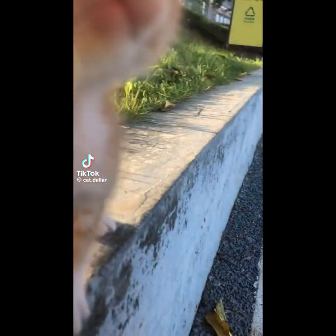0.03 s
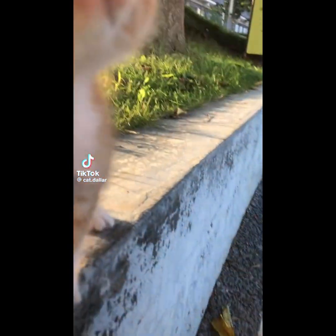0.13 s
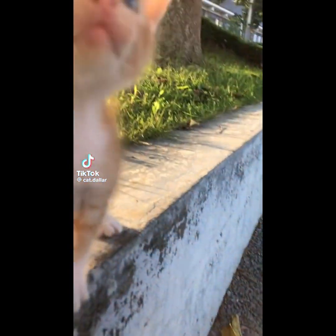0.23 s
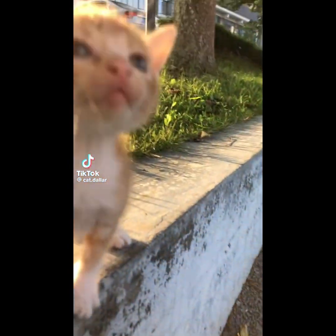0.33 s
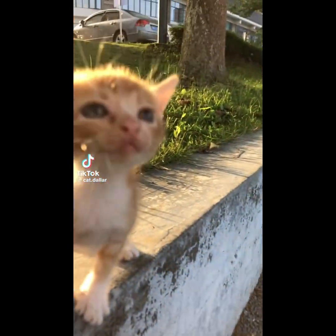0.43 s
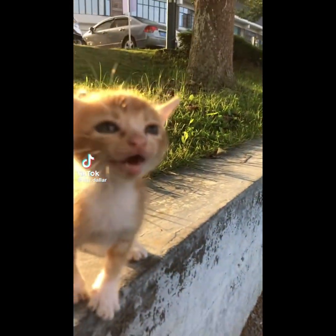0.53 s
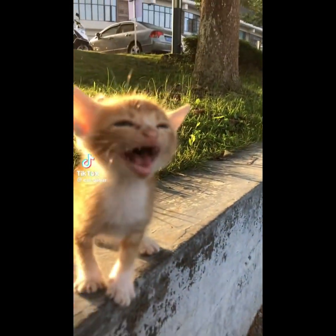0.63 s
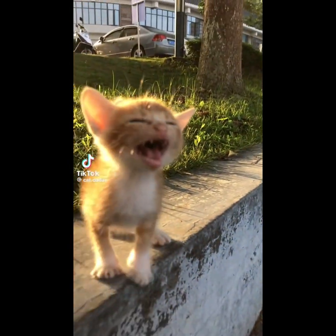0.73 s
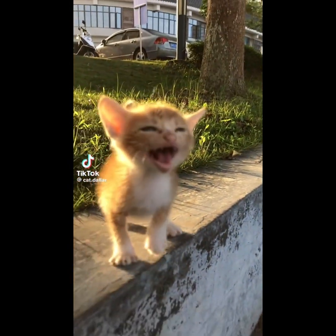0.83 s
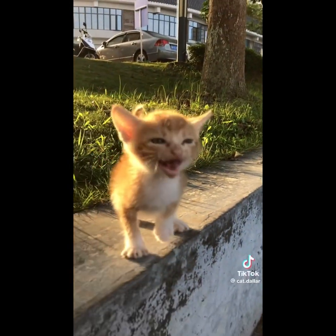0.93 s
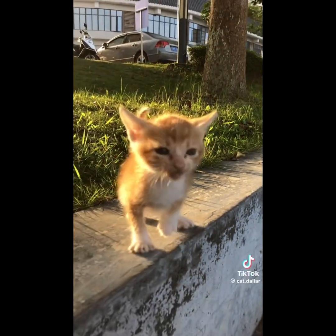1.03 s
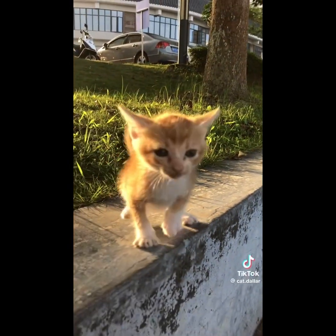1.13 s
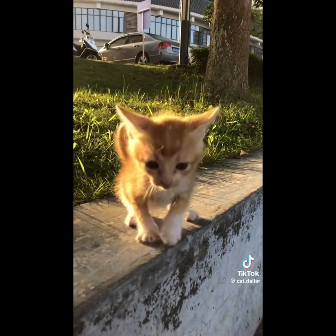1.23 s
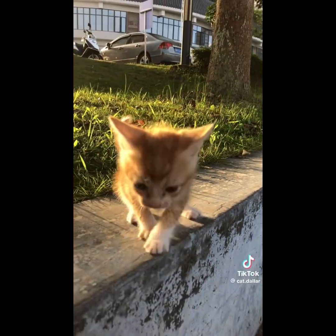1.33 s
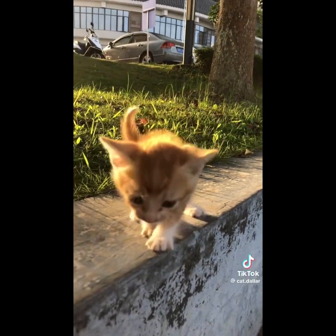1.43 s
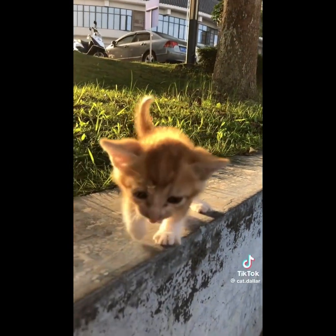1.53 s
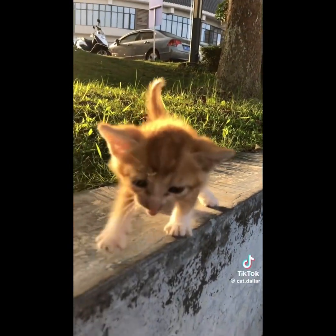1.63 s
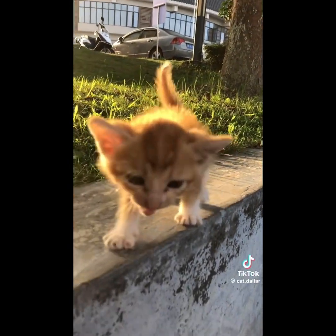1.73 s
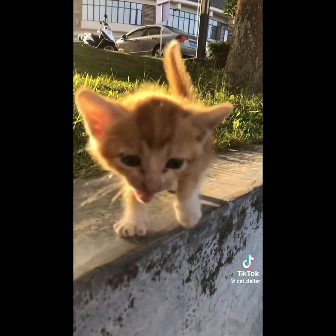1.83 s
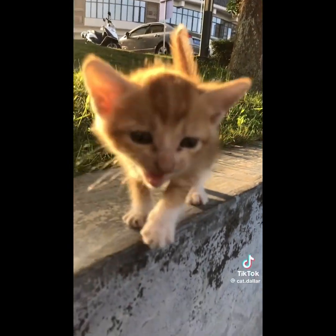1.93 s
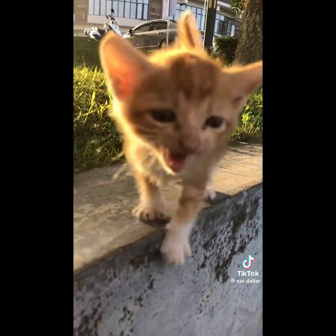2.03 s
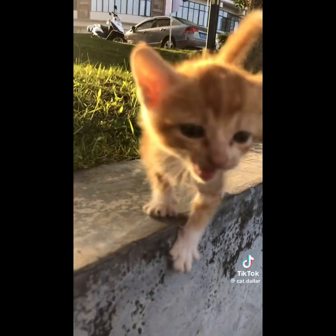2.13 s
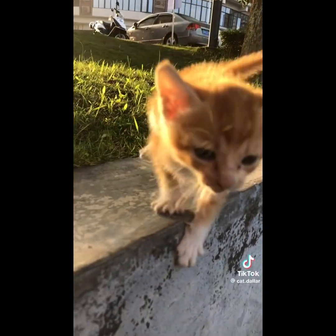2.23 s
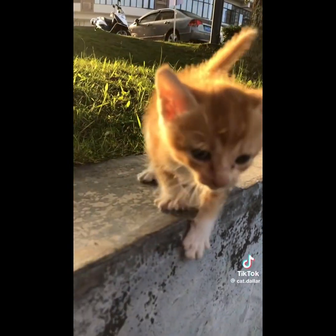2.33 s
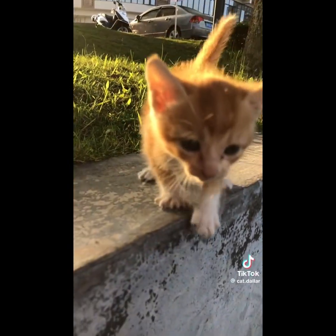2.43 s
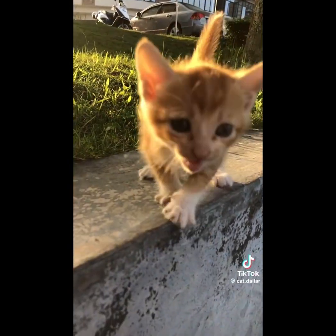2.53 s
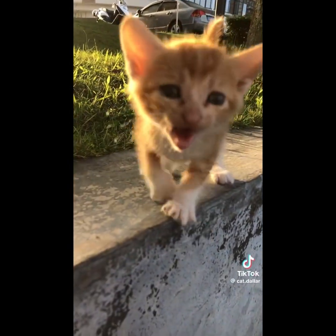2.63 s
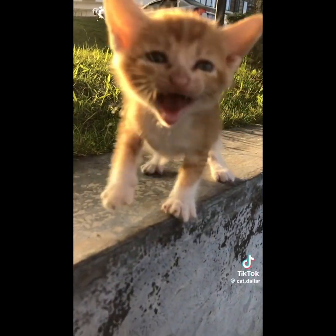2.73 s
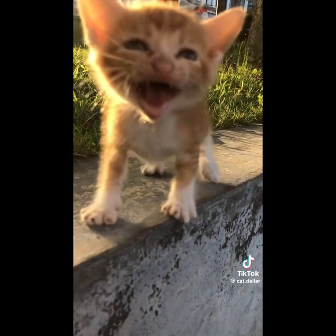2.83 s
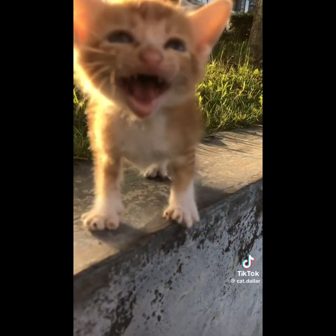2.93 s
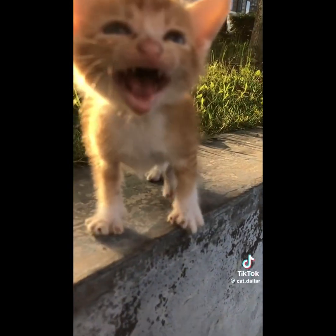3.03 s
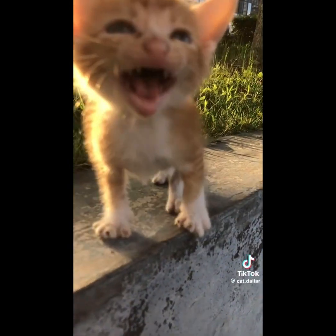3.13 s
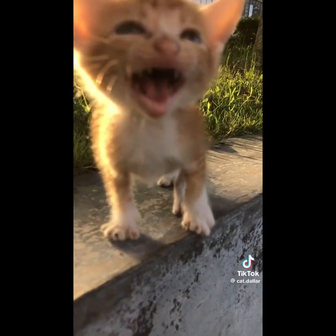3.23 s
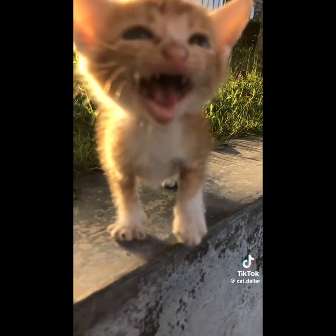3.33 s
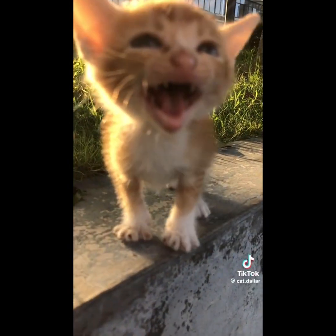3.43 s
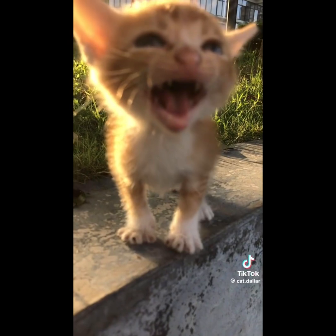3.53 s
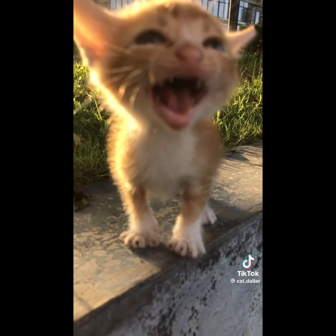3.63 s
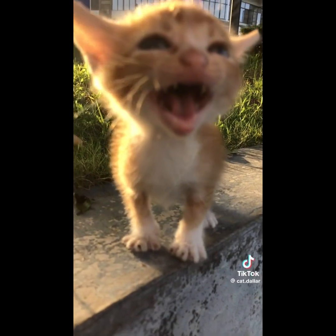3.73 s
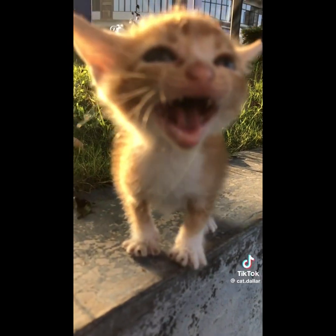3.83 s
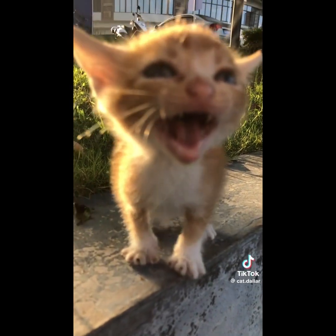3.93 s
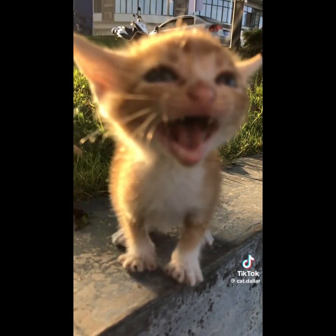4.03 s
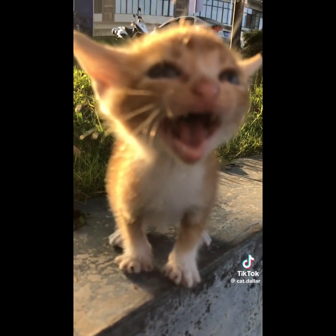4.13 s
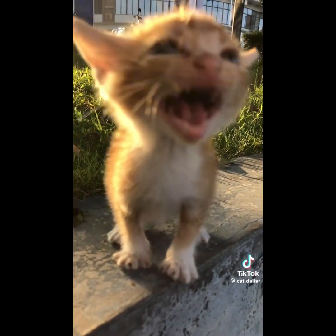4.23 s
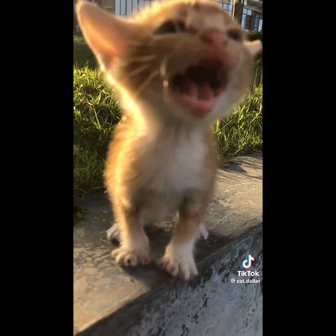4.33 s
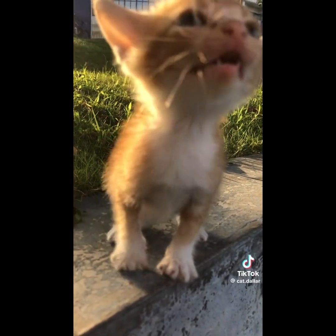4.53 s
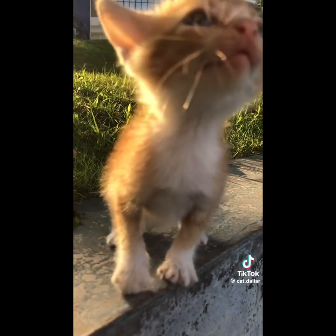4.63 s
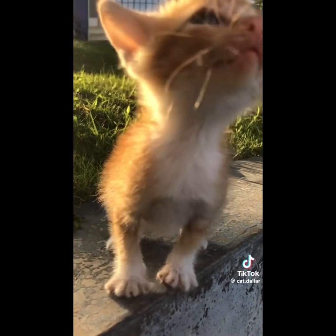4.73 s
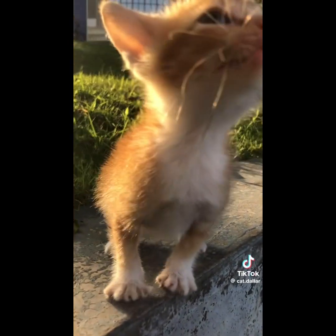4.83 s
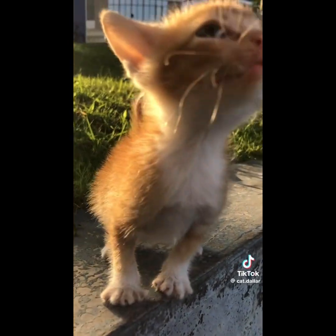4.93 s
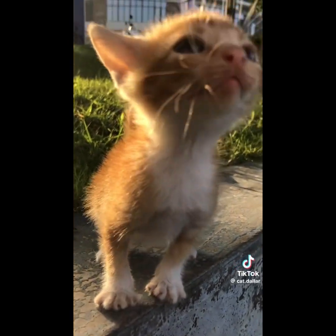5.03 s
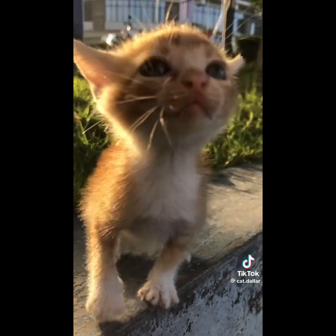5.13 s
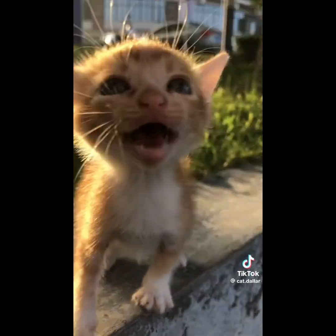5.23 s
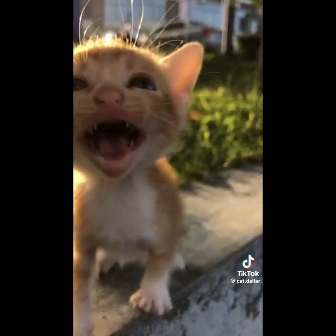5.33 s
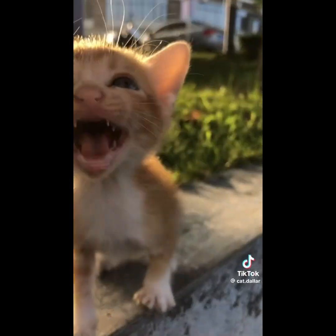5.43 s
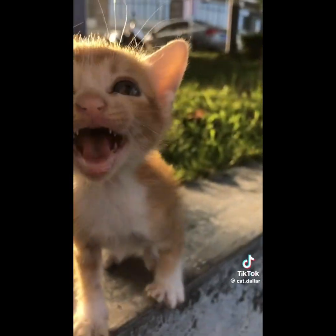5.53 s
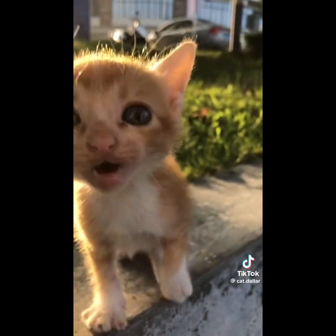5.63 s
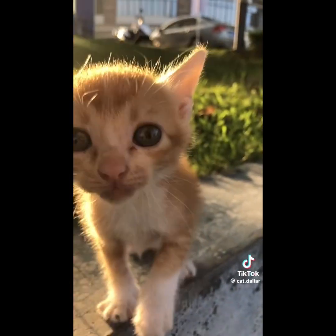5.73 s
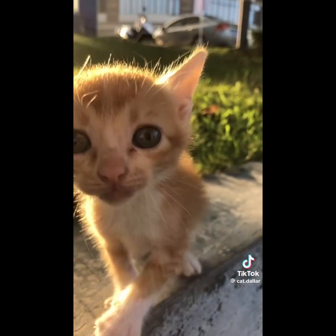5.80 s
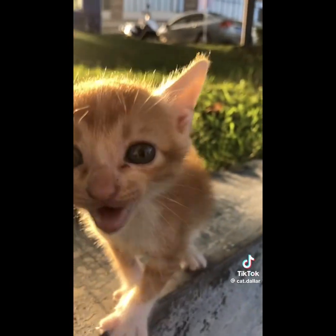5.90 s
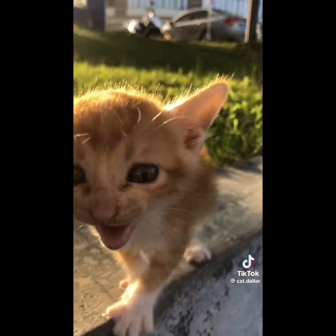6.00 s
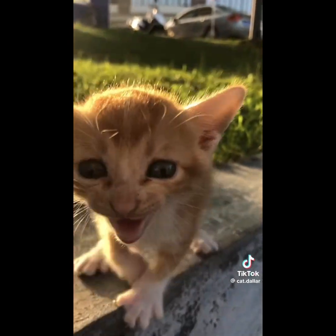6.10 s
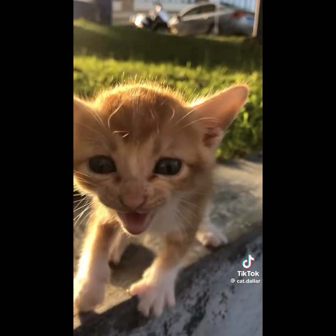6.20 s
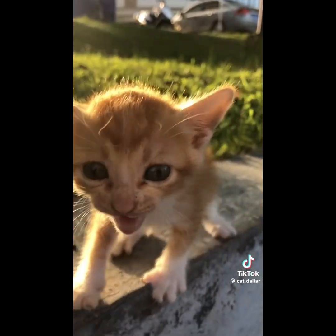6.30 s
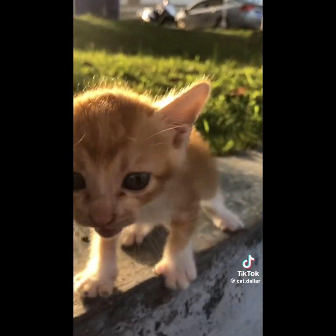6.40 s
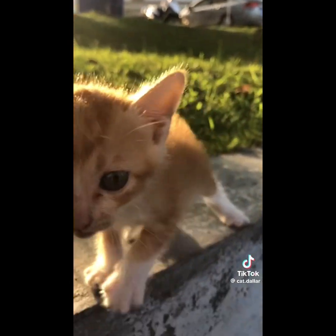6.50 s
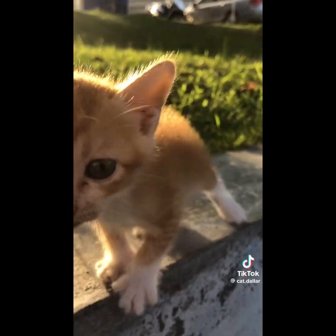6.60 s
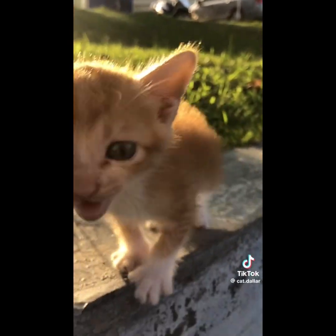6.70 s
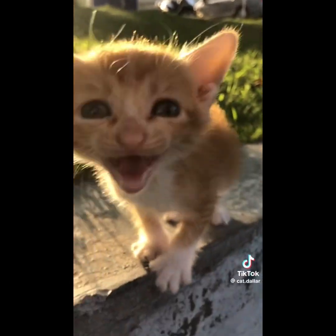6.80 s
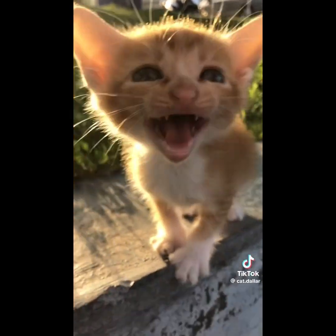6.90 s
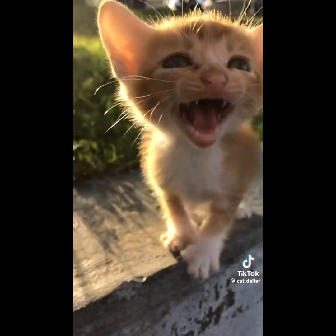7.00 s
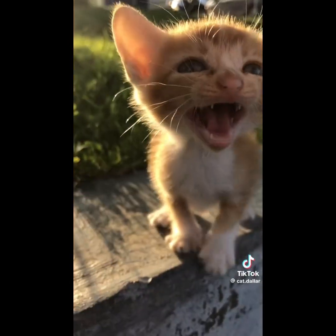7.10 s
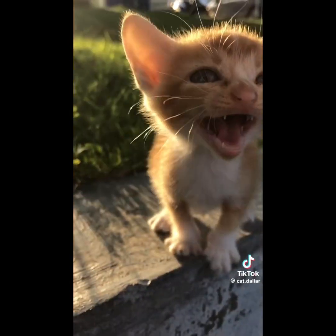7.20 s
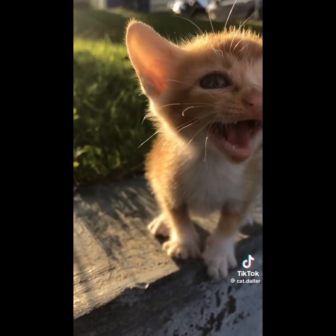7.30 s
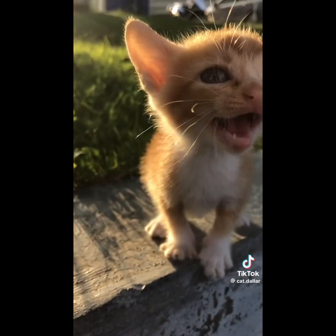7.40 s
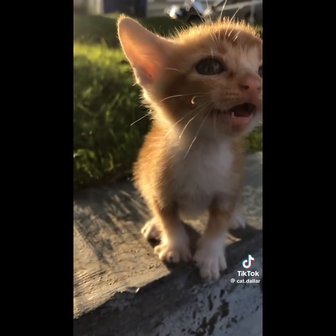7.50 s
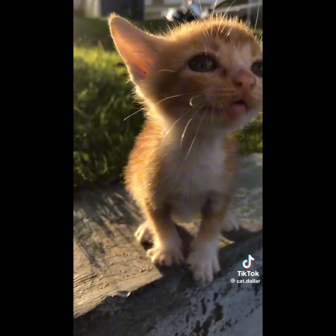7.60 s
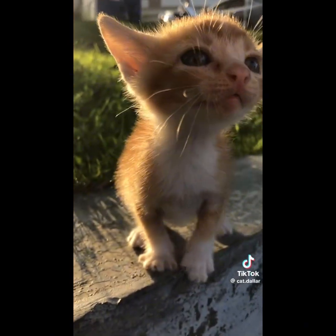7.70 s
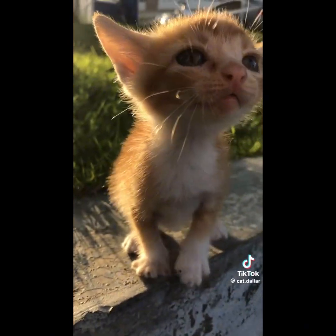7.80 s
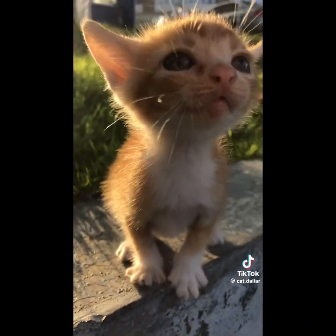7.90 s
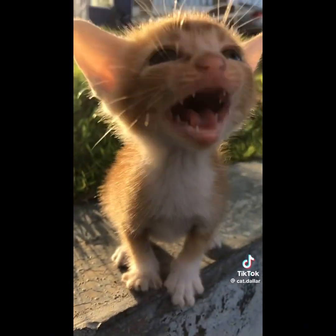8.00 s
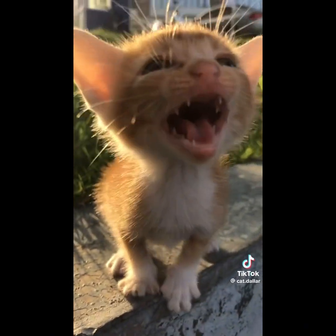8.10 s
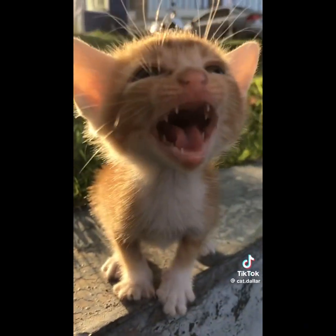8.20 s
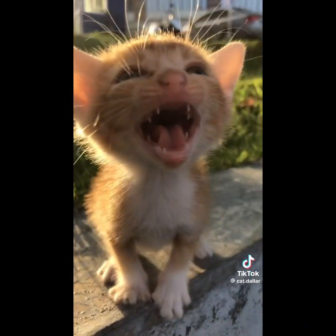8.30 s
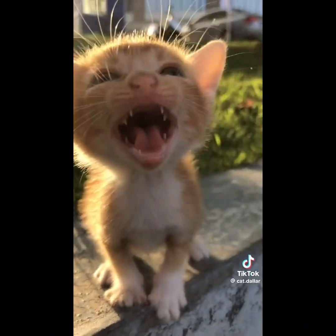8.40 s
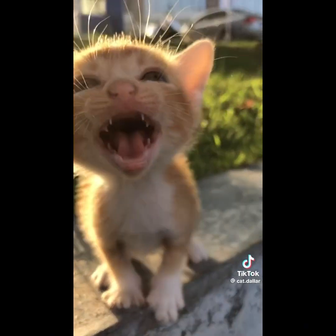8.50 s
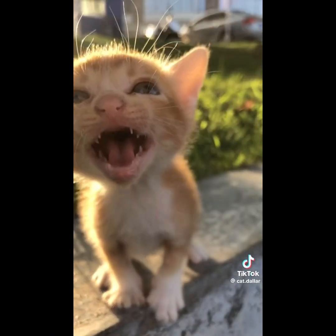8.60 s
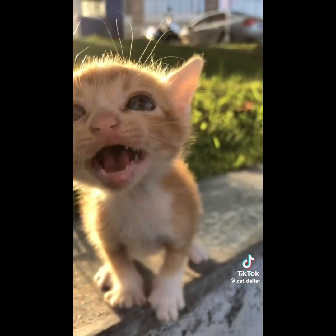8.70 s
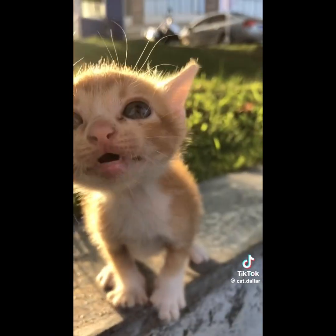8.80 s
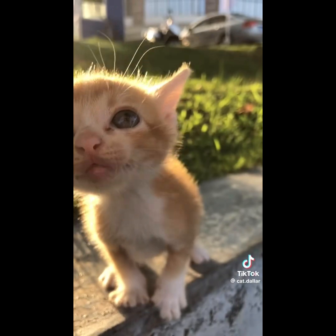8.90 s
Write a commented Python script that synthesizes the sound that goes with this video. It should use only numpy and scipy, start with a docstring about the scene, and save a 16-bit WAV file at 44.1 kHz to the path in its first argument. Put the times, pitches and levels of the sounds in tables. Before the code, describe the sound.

A tiny kitten meows seven times, high, piercing and raspy, close to the microphone outdoors, over faint distant traffic rumble.

```python
"""Concrete ledge beside a lawn: a young kitten meows seven times, close to a phone.
Each meow is a sum of vocal-fold harmonics, arching in pitch while the mouth opens and shuts,
which sweeps a strong resonance over them; shaped noise is the air rushing through the mouth.
Noise bursts are faint paw scuffs; behind lie far traffic rumble and hiss (shaped noise),
a thin distant whistle (gliding sine) and a very faint dull echo tail of the kitten."""
import sys
import numpy as np
from scipy import signal
from scipy.fft import rfft, irfft
from scipy.io import wavfile
from scipy.ndimage import uniform_filter1d

SR = 44100
rng = np.random.default_rng(int(sys.argv[2]) if len(sys.argv) > 2 else 0)


def bounce(signal):
    """Save signal as a 16-bit WAV file at the path given by the first command-line argument."""
    frames = np.transpose(np.atleast_2d(signal))
    limited = np.clip(frames, -1, 1)
    pcm = np.round(limited * 32767).astype(np.int16)
    wavfile.write(sys.argv[1], SR, pcm)


N = 394694
EDGE_HZ = 15600  # upper band limit


def gain_of(db):
    """Decibels to amplitude; an imaginary part becomes phase."""
    return 10 ** (np.asarray(db) / 20)


def evened(x):
    """Scales to rms 1."""
    return x / np.sqrt(np.mean(x ** 2) + 1e-20)


def read(points, hz):
    """Reads a spectrum on a log-frequency axis."""
    f, value = np.transpose(points)
    return np.interp(np.log(hz + 1), np.log(f + 1), value)


def follow(rows, t):
    """Reads every column of a curve at times t."""
    s, *columns = np.transpose(rows)
    return [np.interp(t, s, c) for c in columns]


def add(mix, s, sound):
    """Mixes a sound in at time s."""
    part = mix[:, round(s * SR):][:, :sound.shape[-1]]
    part += sound[..., :part.shape[1]]


def wander(hz, size):
    """Smooth random curve, up to about hz changes a second; rms 1 before trimming to size."""
    f = np.fft.rfftfreq(2 ** 17, 1 / SR)
    smooth = rfft(rng.standard_normal(2 ** 17)) / (1 + (f / hz) ** 2)
    return evened(irfft(smooth))[:size]


def bump(hz, centre, width):
    """Resonance response, 1 at its centre: real part = bell shape, imaginary part = phase."""
    return 1 / (1 + 2j * (hz - centre) / width)


def spell(t, s, half):
    """Flat-topped swell around time s."""
    return np.exp(-((t - s) / half) ** 4)


def noise(colour_db, likeness, size):
    """Stereo noise, rms 1, whose short-time spectra follow colour_db(Hz, s)."""
    hop = size // 4
    hz = np.fft.rfftfreq(size, 1 / SR)[:, None]
    t = np.arange(N // hop + 5) * hop / SR
    a, b, c, d = rng.standard_normal((4, len(hz), len(t)))
    same = np.clip(read(likeness, hz), -1, 1)
    mid = np.sqrt(1 + same) * (a + 1j * b)
    side = np.sqrt(1 - same) * (c + 1j * d)
    spectra = np.array([mid + side, mid - side]) * gain_of(colour_db(hz, t))
    return evened(signal.istft(spectra, nperseg=size, noverlap=size - hop)[1][:, :N])


# Far traffic spectrum: f/Hz, relative level/dB per Hz
TRAFFIC = [(24, -35.5), (40, -18), (58, -4.5), (92, -6), (161, -1), (193, -4.5), (248, -7), (331, -13.5),
           (746, -26.5), (1190, -23.5), (3000, -37), (3900, -48), (6600, -120)]
# Faint hiss spectrum: f/Hz, relative level/dB per Hz
HISS = [(2000, -20), (3000, -1), (4200, -1), (5500, -6), (7000, -6), (8400, 0), (9200, -5), (10200, -15),
        (15000, -19)]
# Far whistle glide: t/s, f/Hz, peak level/dB
WHISTLE = [(2.28, 3130, -72), (2.4, 3220, -60), (2.52, 3150, -73)]
TRAFFIC_RMS_DB, HISS_RMS_DB = -42.5, -64.5


def outdoors():
    """Far traffic and hiss as centred shaped noise; the whistle as one gliding sine."""
    centred, t = [(1, 1), (SR / 2, 1)], np.arange(N) / SR
    rumble = noise(lambda hz, s: read(TRAFFIC, hz) - 120 * (hz > 3500), centred, size=4096)
    hiss = noise(lambda hz, s: read(HISS, hz), centred, size=512)
    whistle_hz, whistle_db = follow(WHISTLE, t)
    heard = (t > WHISTLE[0][0]) & (t < WHISTLE[-1][0])
    whistle = heard * gain_of(whistle_db) * np.sin(2 * np.pi * np.cumsum(whistle_hz) / SR)
    return gain_of(TRAFFIC_RMS_DB) * rumble + gain_of(HISS_RMS_DB) * hiss + whistle


def yard(x, t60_s=1.0, wet_db=-43):
    """Ledge, trees and walls scatter a very faint dull tail."""
    t = np.arange(SR // 2) / SR
    dull = signal.lfilter([1], [1, -.6], rng.standard_normal(len(t)))
    tail = dull * gain_of(-60 * t / t60_s)
    return gain_of(wet_db) * signal.fftconvolve(x.mean(0), tail / np.linalg.norm(tail))[:N]


# Paw scuffs and taps: t/s, level/dB (before halving the amplitude), centre f/Hz
PAWS = [(.496, -55, 6000), (2.335, -66, 8200), (4.11, -40.5, 624)]


def paws(decay_s=0.0051):
    """Feet on concrete: short noise bursts, each round one centre frequency."""
    out, t = np.zeros((2, N)), np.arange(2 ** 11) / SR
    hz = np.fft.rfftfreq(2 ** 11, 1 / SR)
    burst = t / decay_s * np.exp(1 - t / decay_s)  # peak 1
    for s, db, centre in PAWS:
        band = bump(hz, centre, centre * 0.32).real
        grit = evened(irfft(rfft(rng.standard_normal(len(t))) * band))
        add(out, s, gain_of(db) * .5 * grit * burst)
    return out


def shimmer(hz, count):
    """Complex random flutter of one harmonic, below hz; one value every 16 samples."""
    b, a = signal.butter(2, min(hz, 1200), fs=SR / 16)
    pair = evened(signal.lfilter(b, a, rng.standard_normal((2, 2 ** 13))))
    return np.sqrt(.5) * pair[:, :count].T @ [1, 1j]


# strain: above this voice level; centre of the affected band
STRAIN_DB, STRAIN_HZ = -46, 13400
STRAIN_SLOPE, STRAIN_HISS_SLOPE = 1.9, 0.75  # dB per dB: loss of harmonics, gain of hiss


def strain_db(hz, level_db):
    """Voice pushed past its easy level, as felt by the top harmonics."""
    return np.maximum(level_db - STRAIN_DB, 0) * bump(hz, STRAIN_HZ, 3000)


# each share fades with its time constant
OPEN_SHARE, OPEN_S = 0.29, 0.085  # jaw opens: resonance starts lower
SHUT_SHARE, SHUT_S = .352, 0.089  # jaw shuts: resonance sinks
PART_SHARE, PART_S = 0.31, 0.018  # lips part: resonance starts damped
DAMP_SHARE, DAMP_S = 0.43, 0.077  # lips close: resonance damped
SOFT_TILT_DB_PER_OCT, SOFT_S = 5, 0.023  # soft onset of the folds: steeper tilt


def articulation(curve, vowel, t):
    """Mouth snaps open, glides and shuts: resonance/Hz, its height/dB, tilt/(dB/octave)."""
    start, end = curve[0][0], curve[-1][0]
    age, left = np.maximum(t - start, 0), np.maximum(end - t, 0)
    knots = [start, (start + end) / 2, end]
    mouth, height_db, tilt_db = (np.interp(t, knots, glide) for glide in np.reshape(vowel, (3, 3)))
    jaw = (1 - OPEN_SHARE * np.exp(-age / OPEN_S)) * (1 - SHUT_SHARE * np.exp(-left / SHUT_S))
    lips = (1 - PART_SHARE * np.exp(-age / PART_S)) * (1 - DAMP_SHARE * np.exp(-left / DAMP_S))
    return mouth * jaw, height_db * lips, tilt_db - SOFT_TILT_DB_PER_OCT * np.exp(-age / SOFT_S)


# Other throat peaks and dips: f/Hz at rest opening, width/Hz, level/dB, exponent following the mouth
THROAT = [(1008, 97, -0.5, 0.083), (1660, 1240, 9.5, 0.041), (2150, 360, -6, 0.3), (2560, 194, -10, 0.16),
          (6467, 210, -13, 1.11), (6890, 1760, 10, 0.22), (13420, 1440, 11, 0.2)]
MOUTH_REST_HZ, MOUTH_WIDTH_HZ = 4353, 1920
NARROWING = 0.81  # exponent: mouth width follows its frequency below rest


def throat_db(hz, mouth, height_db, level_db):
    """Vocal tract gain and phase: resonances move with the mouth; strain dulls the top."""
    opening = mouth / MOUTH_REST_HZ
    others = sum(db * bump(hz, f * opening ** link, width) for f, width, db, link in THROAT)
    ring = height_db * bump(hz, mouth, MOUTH_WIDTH_HZ * np.minimum(opening, 1) ** NARROWING)
    return ring + others - STRAIN_SLOPE * strain_db(hz, level_db)


# Hoarse spells, folds beating unevenly: t/s, half length/s, pitch jitter/share
HOARSE = [(.72, .07, .007), (1.61, .11, .009), (2.7, .08, .007), (2.88, .03, .007), (5.3, .06, .004),
          (6.05, .04, .004), (6.82, .08, .004), (8.07, .06, .004)]
# Voice cracks, pitch flips up: t/s, half length/s, jump/share
CRACKS = [(2.655, .012, .022), (2.871, .007, .02)]
QUIVER_SHARE = .004  # of pitch
CATCH_DB, CATCH_S = 4, .008  # folds catch: kick of the two lowest harmonics
POP_DB, POP_S = 6, .004  # folds part: noisy pop atop the puff
AIR_DB, PUFF_DB = -49.5, -44  # air at the reference brightness; closing puff
AIR_BUILD_S = .018


def meow(curve, vowel, rush, flutter_db=2.5, blur=0.5, blur_hz=120, attack_s=0.0014, cut_s=0.0052,
         flick_s=0.016, flick_db=3, air_after_s=0.032, air_pulsing=0.13):
    """Vocal-fold harmonics through the throat; the folds part with a short flick and a puff."""
    start, end = curve[0][0] - .006, curve[-1][0]
    t = np.arange(round(start * SR), round((end + air_after_s) * SR)) / SR
    pitch, level_db = (uniform_filter1d(c, size=600) for c in follow(curve, t))
    mouth, height_db, tilt_db = articulation(curve, vowel, t)
    after = np.maximum(t - end, 0)

    hoarse = sum(share * spell(t, s, half) for s, half, share in HOARSE)
    cracks = sum(share * spell(t, s, half) for s, half, share in CRACKS)
    quiver = QUIVER_SHARE * wander(22, len(t)) + (.0005 + hoarse) * wander(130, len(t))
    flick_up = 0.22 * np.minimum(after / flick_s, 1)
    phase = 2 * np.pi * np.cumsum(pitch * (1 + cracks + quiver + flick_up)) / SR

    step = slice(None, None, 16)  # gains are computed every 16 samples
    ts, level, gone = t[step], level_db[step], after[step]
    catch_db = CATCH_DB * np.exp(-(ts - start) / CATCH_S)
    voice = np.zeros(len(t))
    for k in range(1, 29):
        hz = k * pitch[step]
        db = level + tilt_db[step] * np.log2(hz / 1000)
        db = db + throat_db(hz, mouth[step], height_db[step], level)
        if k == 1:
            # fundamental grows less with effort, rings on through the flick
            db = db - 0.5 * (level + 56.0) + flick_db * (gone > 0)
            closing = np.exp(-(gone / flick_s) ** 4)
        else:
            closing = np.exp(-gone / cut_s)
        db = db + catch_db * (k <= 2)
        # high harmonics flutter and blur most
        db = db + flutter_db * np.minimum((hz / 6500) ** 2, 1.3) * shimmer(15.1, len(hz)).real
        blurred = np.clip(blur * (hz / 12000) ** 2, 0, .35)
        gain = gain_of(db) * closing * (hz < EDGE_HZ) * (1 + blurred * shimmer(blur_hz, len(hz)))
        voice += np.sqrt(2) * (np.interp(t, ts, gain) * np.exp(1j * k * phase)).real

    # air grows with brightness, leaks past hoarse folds, pulses with them
    flow = gain_of(AIR_DB + .25 * (level_db + 3 * tilt_db + 53))
    flow = flow * (1 + np.minimum(hoarse / .0035, 1.5))
    flow = flow * (1 - np.exp(-(t - start) / AIR_BUILD_S)) * (1 + air_pulsing * np.cos(phase))
    puff = gain_of(PUFF_DB + POP_DB * np.exp(-after / POP_S))
    flow = np.where(after > 0, puff, flow)
    air = rush[:, round(start * SR):][:, :len(t)] * flow * gain_of(2 * wander(70, len(t)))
    fade = np.clip((t - start) / attack_s, 0, 1) ** 2 * np.clip((t[-1] - t) / 0.022, 0, 1)
    return start, (voice + air) * fade


# Pitch and effort of each meow: t/s, f/Hz, voice level/dB (before tilt and throat)
MEOW_1 = [(0.553, 486, -63.1), (0.602, 674, -61.4), (0.712, 884, -53), (0.736, 924, -51.5),
          (0.791, 967, -53), (0.913, 940, -52.8), (0.956, 936, -55), (1.005, 795, -57.5)]
MEOW_2 = [(1.433, 546, -66.5), (1.456, 652.0, -65.9), (1.489, 764, -66.5), (1.544, 737, -61),
          (1.652, 882, -57), (1.817, 1006, -53.5), (2.123, 975, -45), (2.172, 873, -47),
          (2.193, 782, -52.5)]
MEOW_3 = [(2.568, 594, -62.5), (2.636, 731, -60), (2.772, 887, -52.5), (2.82, 896.5, -52.5),
          (2.937, 1011, -48.5), (3.219, 1034, -45), (3.565, 1012, -44.8), (3.838, 1044, -43.5),
          (3.9, 1072.0, -38.5), (3.947, 1049, -39), (4.009, 1062, -37.5), (4.105, 1016, -44),
          (4.388, 1020, -42.4), (4.491, 923, -44.5), (4.522, 855.0, -44), (4.547, 812, -48.5)]
MEOW_4 = [(5.203, 494.0, -60.5), (5.228, 626, -53), (5.309, 860, -48.5), (5.393, 997, -45),
          (5.504, 1007, -45), (5.572, 959, -44), (5.642, 776, -50)]
MEOW_5 = [(5.904, 510, -57.3), (5.928, 650, -54), (6.007, 903.0, -49), (6.115, 1044, -44),
          (6.158, 1021.0, -42.5), (6.227, 1037, -44.5), (6.323, 975, -46), (6.417, 838, -50.5),
          (6.444, 752, -50)]
MEOW_6 = [(6.702, 516, -60), (6.727, 645, -58), (6.782, 814, -53.5), (6.867, 903.0, -46.5),
          (6.921, 979, -46), (7.083, 1014, -44), (7.304, 972, -46), (7.484, 887, -41.2),
          (7.545, 805, -47.5)]
MEOW_7 = [(7.973, 632, -50.5), (8.021, 812, -49), (8.116, 1042.0, -40), (8.162, 1070, -35.5),
          (8.318, 1106, -37.5), (8.487, 1065, -38), (8.707, 922.6, -46.5), (8.766, 843, -44.5),
          (8.79, 838, -45)]
MEOWS = [MEOW_1, MEOW_2, MEOW_3, MEOW_4, MEOW_5, MEOW_6, MEOW_7]
# Vowel per meow, before jaw, lips and soft onset; each at start, middle, end:
# 3 x mouth resonance f/Hz, 3 x its height/dB, 3 x tilt/(dB/octave)
VOWELS = [(4440, 5730, 5500, 15.6, 19, 22, 1.0, -1.05, -3.5),
          (5760, 4780, 3750, 26.6, 20.3, 19.5, 0.1, -1.6, -5.5),
          (5420.0, 4380, 4070, 19.6, 16.0, 33.4, 0, -1.31, -3.5),
          (5140, 4780, 4280, 11.4, 18.8, 28, -1.2, -1.5, -3),
          (5340, 4730, 3500.0, 13.4, 26.5, 37.7, -1, -3, -5.5),
          (5350, 4040, 3760, 18.2, 18, 22.2, -0.9, -2.5, -5.5),
          (4770, 4510, 3420, 9.7, 26.7, 35.3, -1.14, -1.5, -5)]
# Air rushing through the mouth at rest opening: f/Hz, relative level/dB per Hz
AIR = [(1000, -8), (2400, -10), (4800, -3), (7200, 0), (9000, -3), (11000, -4), (12500, 1), (14200, 2),
       (17000, -12)]
# Stereo likeness of the air: f/Hz, left-right likeness (1 = same)
AIR_LIKENESS = [(5000, 1), (12000, .65)]
# Rasps, more air through the mouth resonance: t/s, half length/s, extra level/dB
RASP = [(.72, .06, 4), (1.61, .09, 4), (2.03, .08, 5), (3.17, .07, 7), (3.72, .15, 9), (5.49, .07, 9),
        (6.14, .08, 11), (7.19, .13, 12), (8.18, .03, 10)]


def kitten():
    """Seven meows; the mouth colours the rushing air too."""
    def colour_db(hz, t):
        """Air spectrum over time, set by the nearest meow's mouth, rasp and strain."""
        distance = [np.maximum(curve[0][0] - t, t - curve[-1][0]) for curve in MEOWS]
        mouths = [articulation(curve, vowel, t)[0] for curve, vowel in zip(MEOWS, VOWELS)]
        mouth = np.choose(np.argmin(distance, axis=0), mouths)
        hiss_db = STRAIN_HISS_SLOPE * strain_db(hz, follow(np.vstack(MEOWS), t)[1]).real
        rasp_db = sum(db * spell(t, s, half) for s, half, db in RASP)
        ring = bump(hz, 1.09 * mouth, 1200).real
        breath_db = read(AIR, hz * (MOUTH_REST_HZ / mouth) ** .25)
        return breath_db + (4 + rasp_db) * ring + .4 * rasp_db + hiss_db

    rush, out = noise(colour_db, AIR_LIKENESS, size=256), np.zeros((2, N))
    for curve, vowel in zip(MEOWS, VOWELS):
        add(out, *meow(curve, vowel, rush))
    return out


def scene():
    """Open air behind, kitten near by."""
    cat = kitten()
    return outdoors() + yard(cat) + paws() + cat


def record(dry):
    """The phone's bass cut and band limit."""
    thin = signal.sosfilt(signal.butter(3, 42, "high", fs=SR, output="sos"), dry)
    band_limit = signal.firwin(511, EDGE_HZ, window=("kaiser", 9), fs=SR)
    return signal.oaconvolve(thin, band_limit[None], "same")


dry = scene()
out = record(dry)
bounce(out)
```